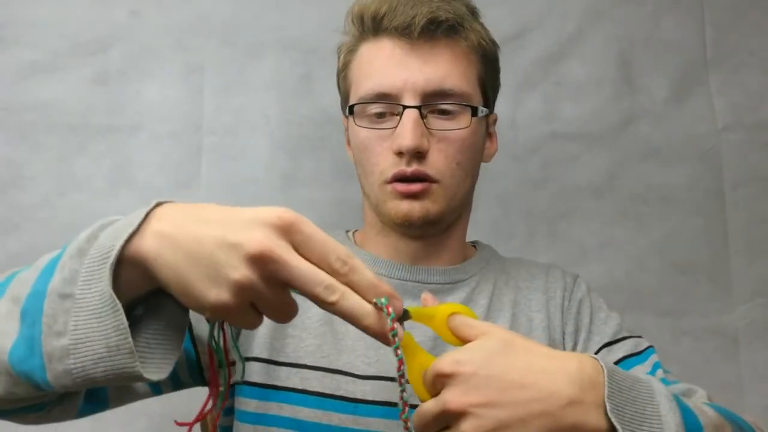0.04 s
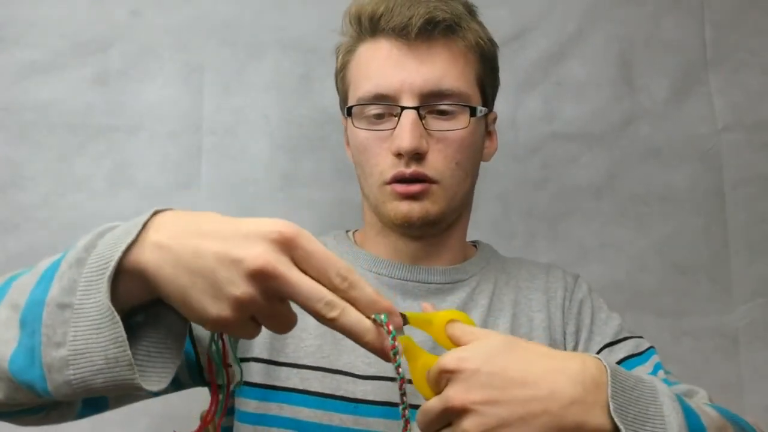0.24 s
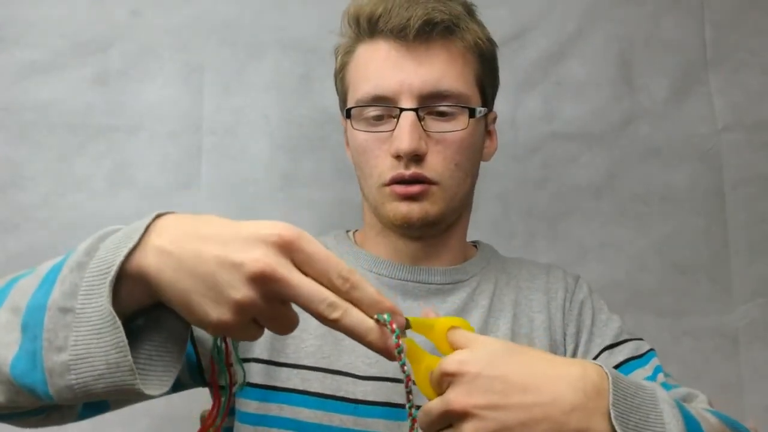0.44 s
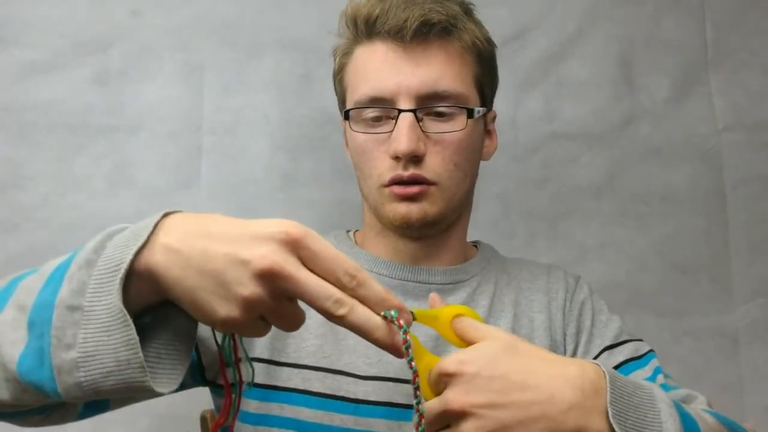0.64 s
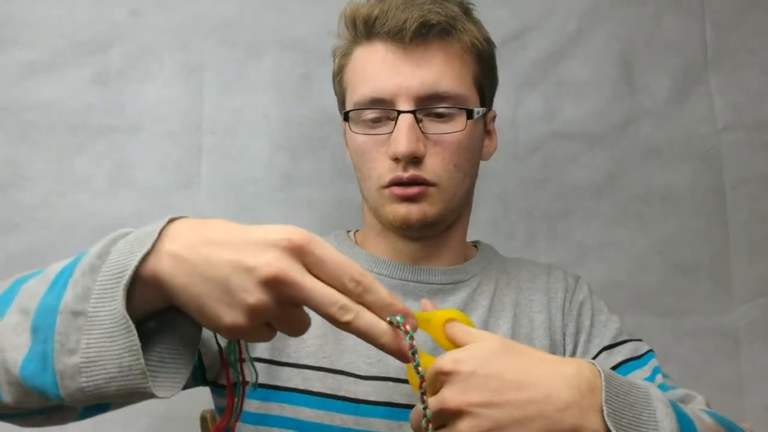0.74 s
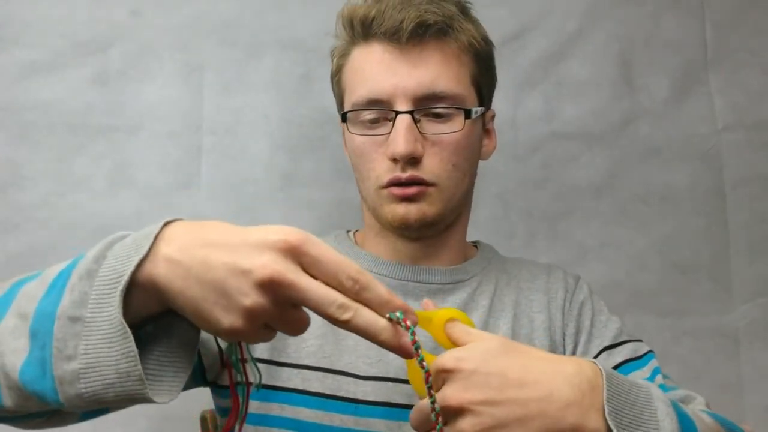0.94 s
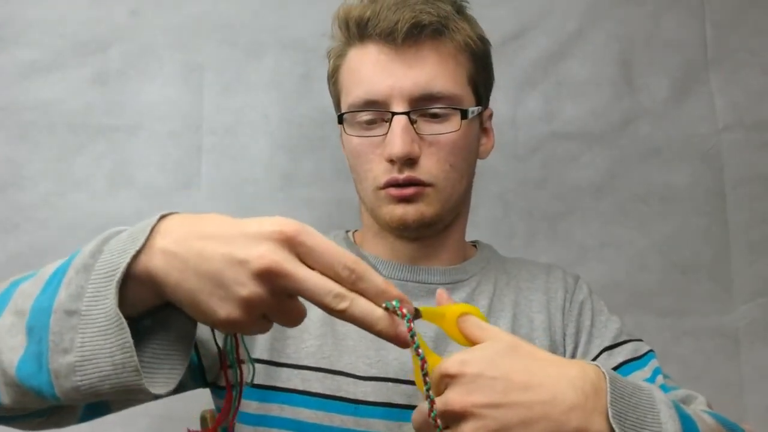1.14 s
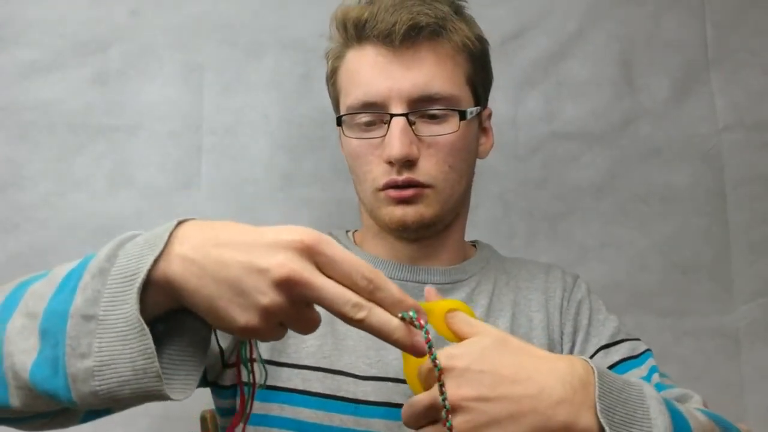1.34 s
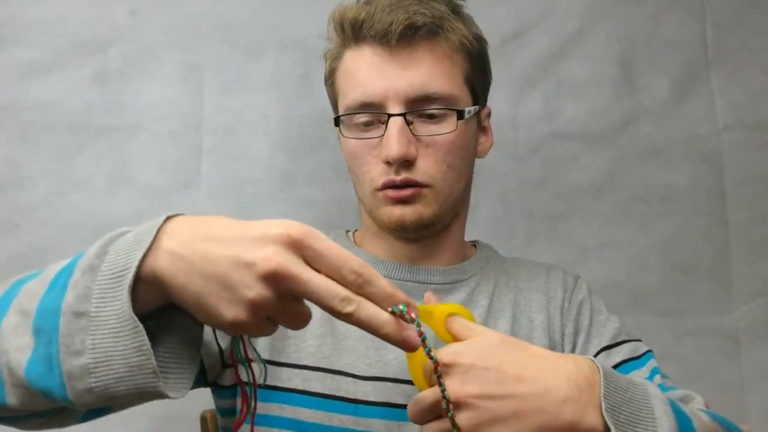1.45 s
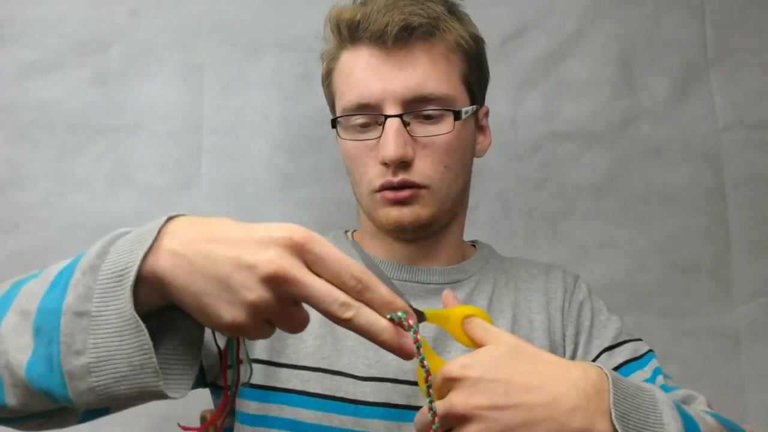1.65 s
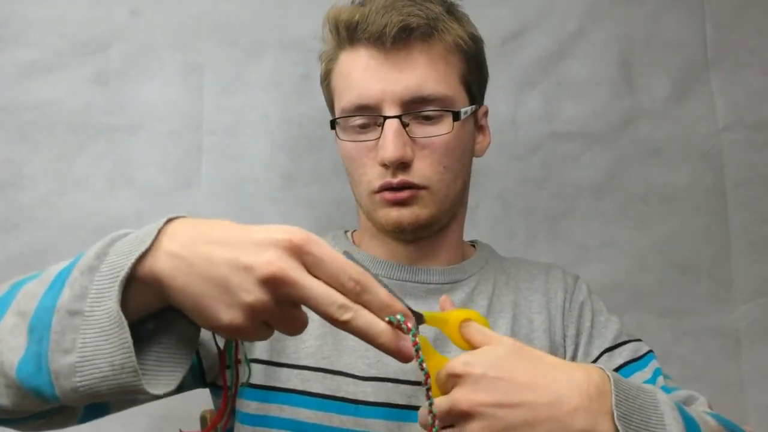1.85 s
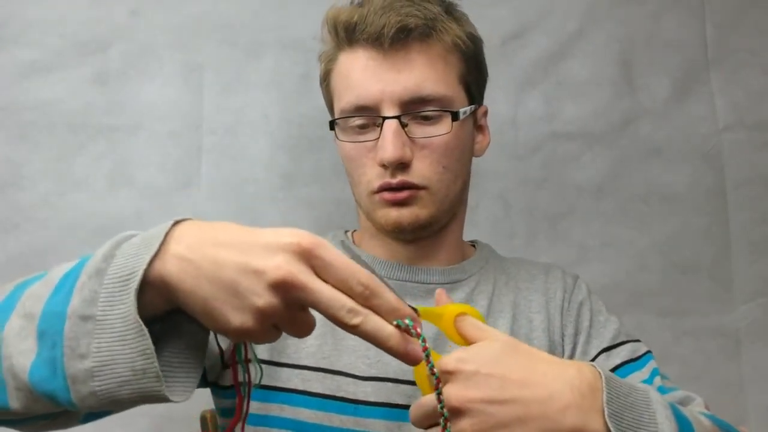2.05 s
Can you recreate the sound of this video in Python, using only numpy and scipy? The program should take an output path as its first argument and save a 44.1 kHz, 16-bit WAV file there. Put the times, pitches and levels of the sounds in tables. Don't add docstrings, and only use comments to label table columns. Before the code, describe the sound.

Small scissors snip a braided thread, one loud sharp cut, then faint clicks and a softer snip

```python
import sys
import numpy as np
from scipy import signal
from scipy.fft import rfft, irfft, next_fast_len
from scipy.io import wavfile
from scipy.ndimage import map_coordinates

SR = 44100
rng = np.random.default_rng(int(sys.argv[2]) if len(sys.argv) > 2 else 0)


def materialize(psi):
    bounded = np.clip(np.atleast_2d(psi).T, -1, 1)
    quanta = np.round(bounded * 32767).astype(np.int16)
    wavfile.write(sys.argv[1], SR, quanta)


def convert_level_to_amplitude(level_db):
    exponent = np.asarray(level_db, float) / 20
    return 10 ** exponent


N = 92124


def unit(x):
    return x / np.sqrt(np.mean(x ** 2) + 1e-20)


def along(points, hz):
    f, v = np.transpose(points)
    return np.interp(np.log(hz + 1), np.log(f + 1), v)


def wobble(knots_per_s):
    knots = rng.standard_normal(int(N * knots_per_s / SR) + 4)
    return map_coordinates(knots, [np.arange(N) * knots_per_s / SR])


def filtered(x, response):
    m = next_fast_len(N + SR // 2)
    return irfft(rfft(x, m) * response(np.fft.rfftfreq(m, 1 / SR)), m)[..., :N]


def pan(db):
    return convert_level_to_amplitude([[db / 2], [-db / 2]])


def peak(f, hz, width_hz):
    return 1j * f * width_hz / (hz * hz - f * f + 1j * f * width_hz)


def stroke(start_s, length_s):
    rise, fall = 0.13, 0.34
    u = (np.arange(N) / SR - start_s) / length_s
    ramp = np.clip(np.minimum(u / rise, (1 - u) / fall), 0, 1)
    return np.sin(np.pi / 2 * ramp) ** 2


# (frequency [Hz], left-right correlation)
ALIKE = [(25, 0.7), (60, 1), (130, 0.84), (290, -0.18), (640, -0.48), (1400, 0.31), (3100, 0.019),
         (15000, -0.0125)]


def noise(spectrum):
    points = [(spectrum[0][0] / 2, -120)] + list(spectrum)

    def mid_side(hz):
        angle = np.arccos(np.clip(along(ALIKE, hz), -1, 1)) / 2
        return convert_level_to_amplitude(along(points, hz)) * [np.cos(angle), np.sin(angle)]

    mid, side = filtered(rng.standard_normal((2, N)), mid_side)
    return unit(np.array([mid + side, mid - side]))


def body(modes, lag_s):
    low_cut_hz = 600

    def response(f):
        total = 0
        for k, (hz, width_hz, db) in enumerate(modes):
            total = total + (-1) ** k * convert_level_to_amplitude(db) * peak(f, hz, width_hz)
        return (1j * f / (low_cut_hz + 1j * f)) ** 2 * total

    top = np.abs(filtered(np.eye(1, N), response)).max()
    lags_s = np.array([[0], [lag_s]])
    return lambda f: response(f) / top * np.exp(-2j * np.pi * f * lags_s)


# (frequency [Hz], width [Hz], level [dB])
HANDLE_MODES = [(980, 250, -16), (1950, 400, -13), (2800, 500, -14), (3550, 600, -2), (4750, 900, -3),
                (5700, 500, 0), (6900, 1400, -10)]
# (frequency [Hz], width [Hz], level [dB])
BLADE_MODES = [(8200, 1300, -5), (8800, 330, 6.5), (10770, 1960, 1.5)]
# (frequency [Hz], width [Hz], level [dB])
TIP_MODES = [(12100, 600, -6), (12900, 600, -9), (14000, 500, -6), (14800, 330, 1), (15400, 500, -8)]
# (time [s], handle [dB], blade [dB], tip [dB], fibre chatter [s])
MAIN_CUT = [
    (.28615, -11, -28, -34, .0003),
    (.2872, -12, -5, -10, .0012),
    (.28815, -32, -15, -11, .0012),
    (.2889, -30, -12, -14, .001),
    (.2982, -44, -40, -28, .001),
]
# (time [s], handle [dB], blade [dB], tip [dB], fibre chatter [s])
LIGHT_CONTACTS = [
    (.1059, -36, -30, -25, .001),
    (.1077, -31, -26, -32, .002),
    (.1101, -33, -21, -20, .004),
    (.1291, -44, -38, -40, .001),
    (1.921, -42, -42, -40, .006),
    (1.925, -39, -42, -40, .008),
    (1.9292, -32, -34, -33, .005),
    (1.9322, -30, -30, -26, .003),
    (1.9339, -34, -22, -24, .002),
                  (0.049, -50, -39, -52, .0004), (0.05, -74, -46, -35, .0004), (0.0523, -36, -36, -24, 0.0027),
          (.0556, -55, -50, -40, .0006), (0.0583, -51, -50, -38, .0006), (0.0655, -34, -40, -29, 0.0011),
          (.508, -37, -47, -52, .002), (1.2113, -33, -34, -45, 0.0055), (1.213, -32, -37, -38, .006),
          (1.2165, -34, -33, -43, 0.016), (1.3807, -36, -38, -48, .002), (1.4047, -29.5, -30, -48, 0.0037),
          (1.406, -28, -33, -39, 0.005), (1.411, -29, -28, -48, 0.0034), (2.057, -53, -42, -34, 0.0032)]


def snips():
    contacts = MAIN_CUT + LIGHT_CONTACTS
    chatter_db = -12
    damping = convert_level_to_amplitude([[[-6]], [[0]], [[0]]])
    force = np.zeros((3, 2, N + SR))
    t = np.arange(SR // 20) / SR
    for time_s, *levels_db, chatter_s in contacts:
        grain = rng.standard_normal((3, 2, len(t)))
        snap = np.abs(rng.standard_normal((3, 1, len(t))))
        chatter = convert_level_to_amplitude(chatter_db - 20 * t / chatter_s) * grain * snap
        push = (t == 0) + chatter * damping
        i = round(time_s * SR)
        force[..., i:i + len(t)] += convert_level_to_amplitude(levels_db)[:, None, None] * push
    handle, blade, tip = force[..., :N]
    return (pan(3.6) * filtered(handle, body(HANDLE_MODES, lag_s=5e-5))
            + pan(3.6) * filtered(blade, body(BLADE_MODES, lag_s=2.4e-5))
            + pan(3.4) * filtered(tip, body(TIP_MODES, lag_s=1.9e-5)))


# (time [s], frequency [Hz], level [dB], t60 [s])
KNOCKS = [(0.105, 376, -37, 0.016), (0.108, 1240, -34.5, 0.017), (.107, 2220, -36, 0.026),
          (0.107, 2900, -31, .012), (1.212, 2030, -44.5, 0.038), (1.407, 1010, -38, 0.018),
          (1.406, 2130, -42.5, 0.039), (1.935, 1270, -32.5, 0.019), (1.927, 3040, -35, .015),
          (1.966, 3760, -44, .02), (2.03, 3580, -41, .02)]


def knocks():
    onset_s = 0.00065
    out = np.zeros(N)
    for time_s, hz, db, t60_s in KNOCKS:
        t = np.clip(np.arange(N) / SR - time_s, 0, None)
        envelope = convert_level_to_amplitude(db - 60 * t / t60_s) * (1 - np.exp(-t / onset_s))
        out += envelope * np.sin(2 * np.pi * hz * t)
    return out


# (time [s], length [s], rasp [dB], resonance [Hz], resonance level [dB])
STROKES = [(0, 0.24, -53.5, 2960, -60.5), (0.531, .04, -62, 13550, -54), (0.827, 0.096, -48.5, 3252, -60),
           (1.001, .18, -54.5, 3800, -52.5), (1.04, 0.15, -61, 7850, -55.5), (1.184, 0.15, -55, 7450, -50),
           (1.402, 0.2, -47, 8500, -59), (1.413, 0.17, -77, 1440, -57.5), (1.664, 0.14, -54, 8100, -61),
           (1.913, 0.083, -47.5, 12300, -43.5), (1.928, 0.052, -64, 6300, -45),
           (2.023, 0.075, -50, 3745, -62)]
# (frequency [Hz], density [dB per Hz])
RASP = [(400, -30), (900, 0.5), (2000, -1.5), (4000, 0), (8000, -2.5), (12000, -6), (15500, -10)]


def rubbing():
    grip_q, pan_db, rough_db = 2.9, 2.4, 0.85
    out = np.zeros((2, N))
    rasp = noise(RASP)
    grain = rng.standard_normal((2, N))
    for start_s, length_s, rasp_db, hz, ring_db in STROKES:
        ring = unit(filtered(grain, lambda f: peak(f, hz, hz / grip_q) ** 2))
        out += stroke(start_s, length_s) * (convert_level_to_amplitude(rasp_db) * rasp + convert_level_to_amplitude(ring_db) * ring)
    return pan(pan_db) * convert_level_to_amplitude(rough_db * (wobble(44.7) + wobble(300))) * out


# (time [s], length [s], level [dB])
SLIDES = [
    (1.015, .16, -56.5),
    (1.41, 0.18, -55.5),
    (1.657, 0.11, -53.5),
    (1.768, 0.032, -55),
]
# (frequency [Hz], width [Hz], level [dB])
SLIDE_MODES = [(2600, 770, -3), (4540, 1170, -2.5)]


def sliding():
    pan_db, rough_db = 7.5, 1.5

    def response(f):
        return sum(convert_level_to_amplitude(db) * peak(f, hz, width_hz) ** 2 for hz, width_hz, db in SLIDE_MODES)

    steel = unit(filtered(rng.standard_normal((2, N)), response))
    pressure = sum(convert_level_to_amplitude(db) * stroke(start_s, length_s) for start_s, length_s, db in SLIDES)
    return pan(pan_db) * pressure * convert_level_to_amplitude(rough_db * wobble(70.4)) * steel


def squeak():
    start_s, length_s, from_hz, to_hz, level_db = 2.06, 0.014, 15600, 12500, -46
    u = np.clip((np.arange(N) / SR - start_s) / length_s, 0, 1)
    turns = np.cumsum(from_hz + (to_hz - from_hz) * u) / SR
    return convert_level_to_amplitude(level_db) * np.sin(np.pi * u) * np.sin(2 * np.pi * turns)


# (frequency [Hz], t60 [s])
ROOM = [(500, 0.083), (2000, 0.34), (5500, 0.31), (10000, 0.37), (15000, 0.073)]


def room(x):
    tail_db, rise_s, wall_db, wall_s, wall_pan_db = -9.5, 0.006, -26, 0.011, 2.4
    hz, t, z = signal.stft(rng.standard_normal((2, SR // 2)), SR, nperseg=256)
    decay = convert_level_to_amplitude(-60 * t / along(ROOM, hz)[:, None])
    tail = signal.istft(z * decay, SR, nperseg=256)[1]
    tail = tail * (1 - np.exp(-(np.arange(tail.shape[1]) / SR / rise_s) ** 2))
    tail = tail / np.linalg.norm(tail[0]) / 2
    spread = x.mean(axis=0)[None] + x[::-1]
    wet = signal.fftconvolve(spread, tail, axes=1)[:, :N]
    wall = np.pad(x, ((0, 0), (round(wall_s * SR), 0)))[:, :N] * pan(wall_pan_db)
    return convert_level_to_amplitude(tail_db) * wet + convert_level_to_amplitude(wall_db) * wall


# (frequency [Hz], density [dB per Hz])
HISS = [(180, -22), (300, -4.5), (562, -6.5), (1200, -6), (1850, -7), (2040, -8), (2220, -7.5), (3960, -7),
        (15600, -13.5)]
# (frequency [Hz], density [dB per Hz])
RUMBLE = [(8.8, -13), (15, -19), (19, -19.5), (22, -6), (59, -10.5), (312, -17.5), (400, -31), (520, -59),
          (880, -120)]


def recorder_floor():
    hiss_db, waver_db, rumble_db = -49.5, 0.1, -56.5
    hiss = convert_level_to_amplitude(hiss_db + waver_db * wobble(2.3)) * noise(HISS)
    return hiss + convert_level_to_amplitude(rumble_db) * noise(RUMBLE)


def scene():
    near = snips() + knocks() + squeak()
    return near + room(near) + rubbing() + sliding() + recorder_floor()


def band_limit(x):
    return signal.sosfilt(signal.butter(12, 16630, fs=SR, output="sos"), x)


def record(dry):
    top_hz, offset = 15800, -0.0024
    mix = filtered(dry, lambda hz: np.exp(-(hz / top_hz) ** 120)) + offset
    return band_limit(mix)


dry = scene()
out = record(dry)
materialize(out)
```